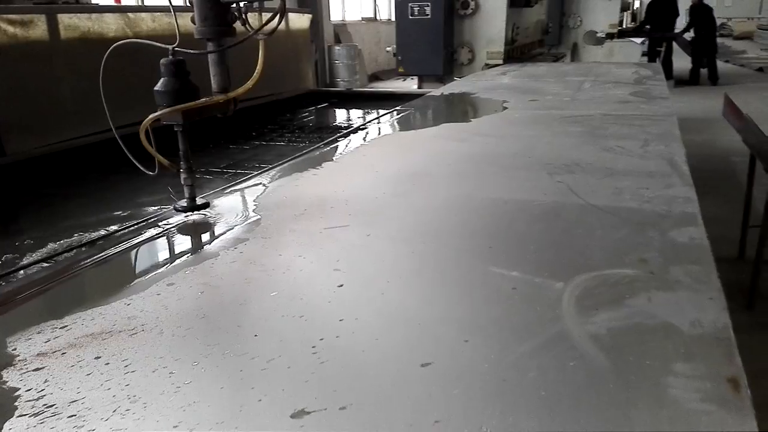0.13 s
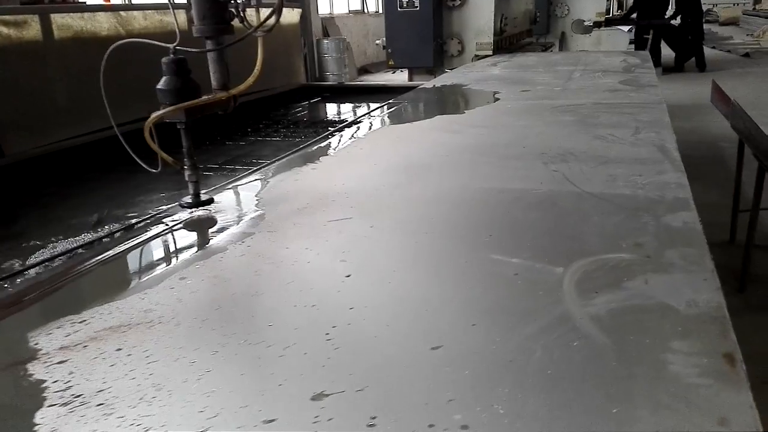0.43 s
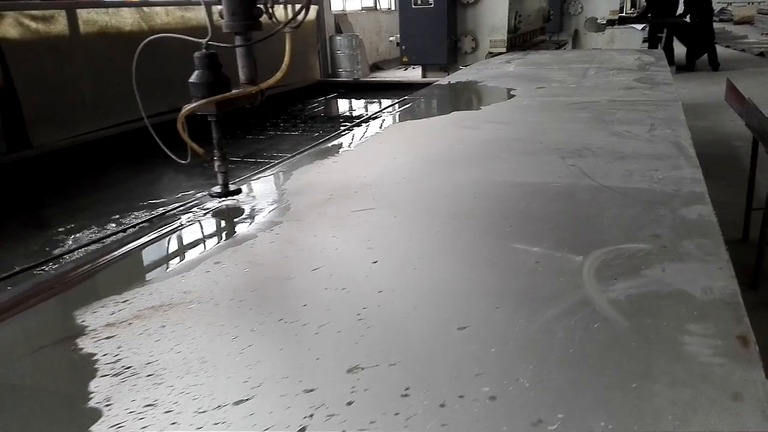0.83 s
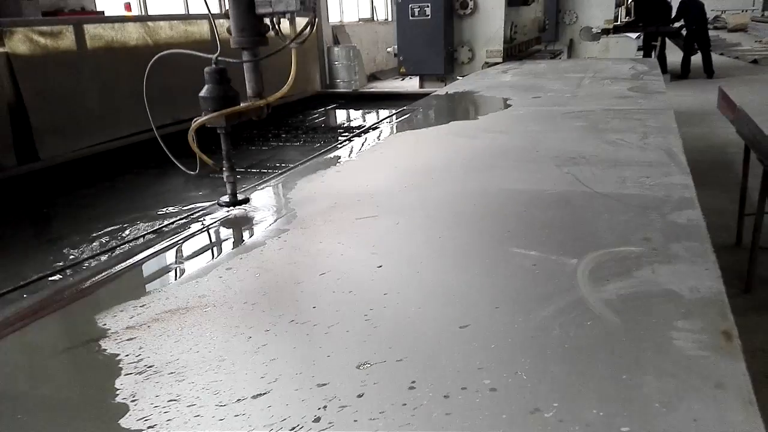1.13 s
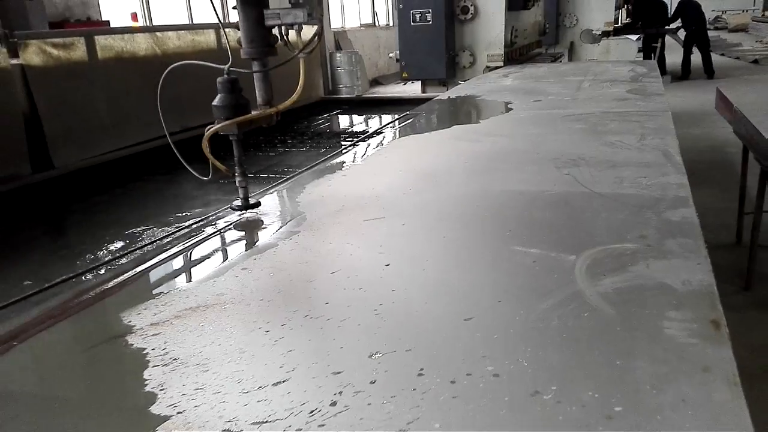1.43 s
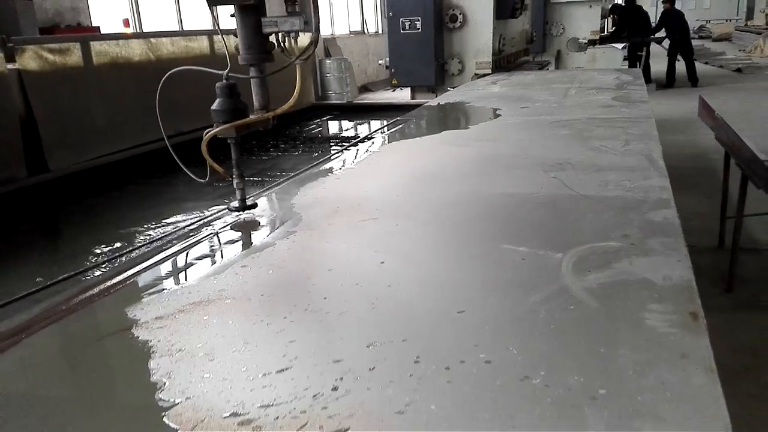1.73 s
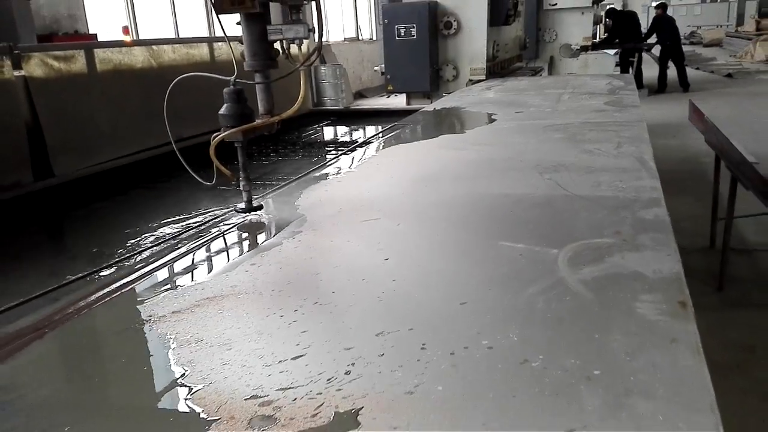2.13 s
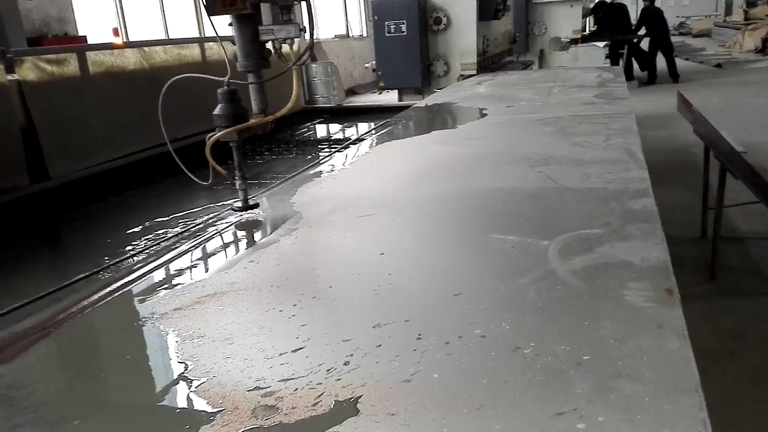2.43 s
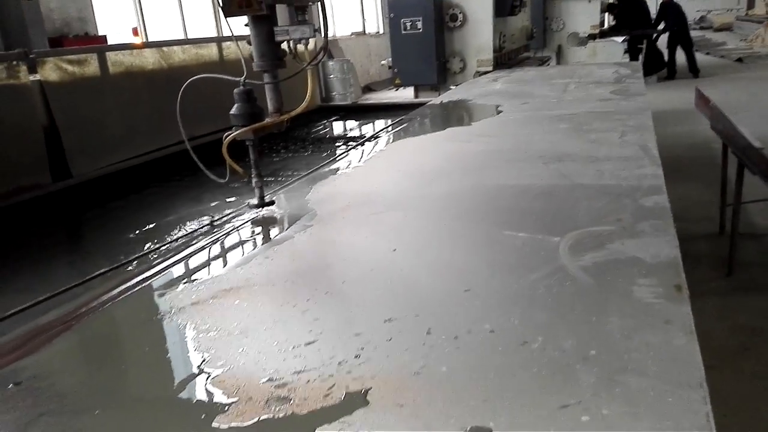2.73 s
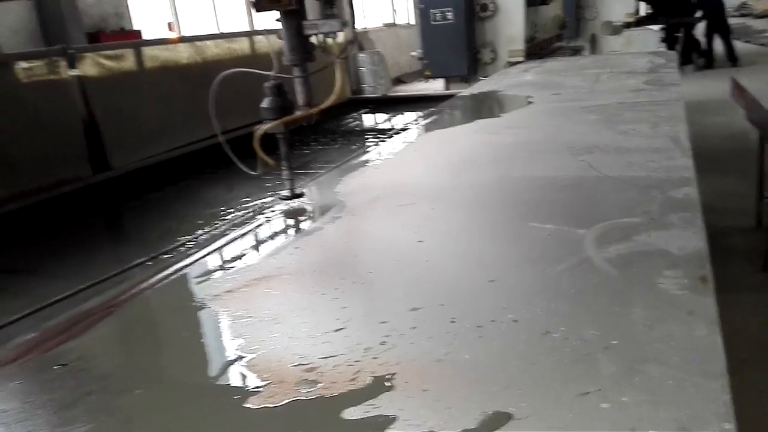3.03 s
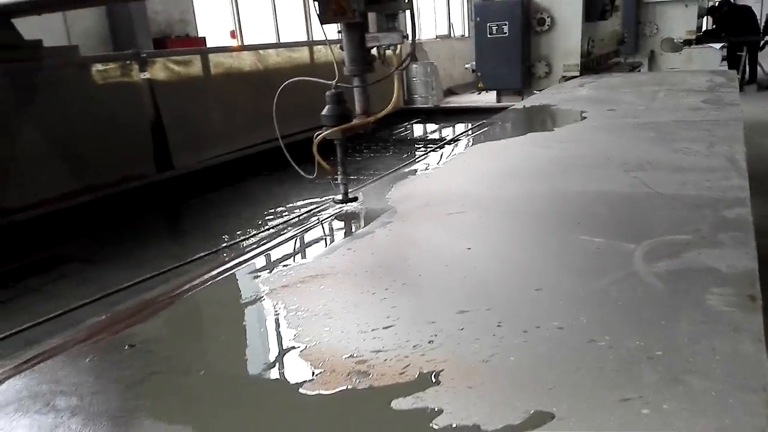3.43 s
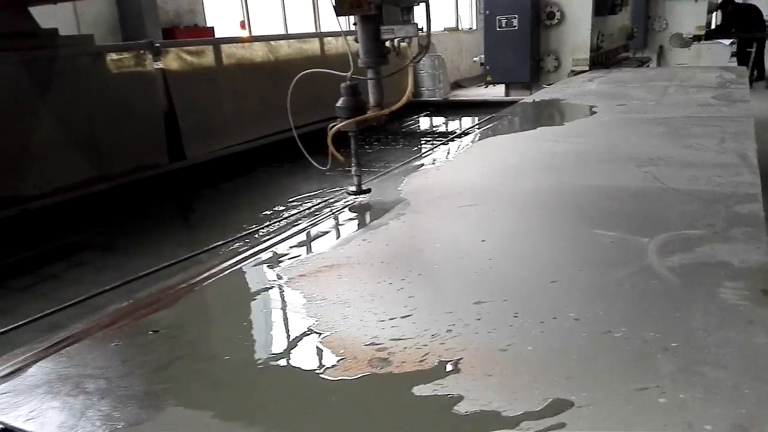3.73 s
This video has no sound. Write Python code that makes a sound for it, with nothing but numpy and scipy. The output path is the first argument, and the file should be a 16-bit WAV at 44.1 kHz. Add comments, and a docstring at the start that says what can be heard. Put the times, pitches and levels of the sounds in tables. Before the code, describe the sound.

A high-pressure waterjet cutter hisses and roars continuously through a wet metal plate, very loud and close.

```python
"""Waterjet cutting a wet plate

A high-pressure waterjet cuts a wet metal plate in a workshop, close to a handheld stereo microphone.
Coloured noise makes the sputtering hiss, the fine spray, and the roar and churn in the tank below.
Noise in a moving narrow band makes the slot's hoarse whistle; fixed bands make the pump tones.
Two throatier surges break through the plate. The loud sound overloads the microphone."""
import sys
import numpy as np
from scipy import signal
from scipy.fft import rfft, irfft, next_fast_len
from scipy.io import wavfile
from scipy.ndimage import uniform_filter1d, map_coordinates

SR = 44100
rng = np.random.default_rng(int(sys.argv[2]) if len(sys.argv) > 2 else 0)


def inscribe(sig):
    """Save sig as 16-bit PCM at rate SR to the path in sys.argv[1].

    A 1-D sig is mono; a 2-D sig holds one channel per row.
    Samples are clipped to [-1, 1] before scaling.
    """
    pcm = np.round(np.clip(np.atleast_2d(sig).T, -1, 1) * 32767)
    wavfile.write(sys.argv[1], SR, pcm.astype(np.int16))


N = 171108  # length in samples

# Layer levels over time, before each layer's trim and wobble: start_s, level_db
# the jet striking the plate
JET_LEVEL = [(0, -13.5), (.09, -16.5), (.18, -15), (.3, -12), (.46, -17), (.53, -15), (.83, -13),
             (.97, -14), (1.12, -16.5), (1.19, -14), (1.3, -14), (1.42, -16.5), (1.54, -17), (1.64, -12),
             (1.68, -15.5), (1.74, -12.5), (1.81, -13.5), (1.95, -12.5), (2.01, -16.5), (2.08, -17.5),
             (2.11, -14), (2.16, -18.5), (2.21, -14.5), (2.27, -17.5), (2.32, -13), (2.39, -15),
             (2.43, -12.5), (2.58, -11.5), (2.61, -16.5), (2.65, -11.5), (2.7, -15.5), (2.8, -14),
             (2.9, -14), (2.97, -11), (3.45, -12), (3.59, -15.5), (3.68, -12.5), (3.87, -13)]
# fine spray
SPRAY_LEVEL = [(0, -22), (.06, -23.5), (.14, -22), (.35, -21.5), (.42, -24.5), (.76, -20.5), (.96, -21),
               (1.06, -19), (1.11, -22.5), (1.31, -20.5), (1.49, -24), (1.76, -19.5), (1.92, -20.5),
               (2.06, -23.5), (2.32, -22.5), (2.52, -15.5), (2.61, -23), (2.79, -18), (2.9, -23.5),
               (2.99, -20.5), (3.08, -20.5), (3.15, -17), (3.24, -21.5), (3.45, -18), (3.6, -20.5),
               (3.88, -20)]
# the jet roaring through the plate into the tank
ROAR_LEVEL = [(0, -22), (.2, -24), (.33, -21.5), (.43, -20.5), (.8, -21), (1.3, -20.5), (1.47, -16),
              (1.8, -18.5), (2.25, -19), (2.68, -19), (2.76, -18), (2.8, -22.5), (3.1, -21), (3.27, -23.5),
              (3.43, -17.5), (3.52, -22.5), (3.65, -21), (3.72, -16.5), (3.88, -17)]
# water churning in the tank
CHURN_LEVEL = [(0.0, -33), (0.1, -20.5), (0.22, -27.0), (0.28, -21.5), (0.36, -27), (0.49, -24),
               (1.34, -28.5), (1.43, -19), (1.9, -24.5), (1.99, -18), (2.4, -27.5), (2.43, -45), (2.5, -25),
               (2.86, -25.5), (2.91, -16.5), (2.98, -37), (3.09, -24), (3.18, -40), (3.26, -22),
               (3.58, -32), (3.76, -14), (3.87, -18.5)]
# hoarse whistle of the slot (wobble only, no trim)
WHISTLE_LEVEL = [(0, -31), (.5, -18), (1.4, -27), (1.5, -26), (1.74, -21.5), (1.8, -7), (1.86, -23),
                 (2.06, -21), (2.1, -7), (2.16, -28), (2.57, -20), (2.63, -8.5), (2.76, -9.5), (2.81, -22),
                 (2.87, -11), (2.94, -26), (3.02, -18), (3.55, -29), (3.8, -13)]
JET_TRIM_DB, SPRAY_TRIM_DB, ROAR_TRIM_DB, CHURN_TRIM_DB = 6, 3.5, 3.5, 0.5
SHOP_LEVEL_DB = -28.5

# Spectral colour of each layer, only the shape counts: freq_hz, relative_db
# hiss at the cut
JET_COLOUR = [(500, -31.5), (1200, -14.5), (2000, -4.5), (2700, -1), (3350, -2), (3900, 0.5), (4500, 2),
              (4900, 1.3), (5300, -0.5), (5700, -4), (6800, -8), (9000, -21), (14000, -45)]
# fizz of the mist
SPRAY_COLOUR = [(2500, -37), (5500, -4), (7200, 0.5), (8500, 0.5), (10500, -2.5), (13300, -7),
                (14200, -11.5)]
# roar in the tank
ROAR_COLOUR = [(200, -14), (450, -6), (650, -4), (850, -0.5), (1100, -1), (1450, -1.5), (1800, -5),
               (2700, -6.5), (5000, -40)]
# churning water
CHURN_COLOUR = [(20, -30), (95, -15), (138, -4), (230, -2), (310, 0.5), (420, 1.5), (560, -3.5), (800, -5),
                (1300, -10), (3000, -42)]
# low rumble of the hall
SHOP_COLOUR = [(12, 13.5), (33, 3.5), (46, 3.5), (57, -3), (80, 6), (120, -7), (250, -13), (800, -30)]
# throaty rush of a breakthrough
SURGE_COLOUR = [(90, -21), (130, -5), (220, -12), (380, -5.5), (700, -3.5), (1000, -1.5), (1350, 2),
                (1750, -0.5), (2400, -4), (3200, -8.5), (5000, -35)]

# pump and motor tones: pitch_hz, level_db, width_hz (each side of the pitch, where it is 6 dB down)
PUMP_TONES = [(170.8, -36, 7.4), (304, -36, 9.5), (1032, -34.5, 8)]
# likeness of the noise at the two microphone ports: freq_hz, correlation (-1 to 1)
PORT_LIKENESS = [(50, 1), (220, 0.92), (370, .75), (580, -0.35), (820, 0.21), (1200, 0.57), (1600, 0.027),
                 (2100, -0.087), (2800, -0.13), (3400, 0.32), (3900, -0.38), (4500, -0.23), (5200, -0.01),
                 (13000, -0.058)]
# each port has its own resonance: freq_hz, left_minus_right_db
PORT_BALANCE = [(200, -1), (1400, -0.5), (2100, -1.5), (2700, -4.5), (3350, -3), (4000, -6), (4500, -2.5),
                (4800, 4.5), (5100, 3), (5500, 2), (6600, 0.5), (8000, 1.5), (13000, 1.5)]
# centre of the whistle, which dips as the slot opens and then recovers: start_s, pitch_hz
WHISTLE_PITCH = [(0, 2900), (1.3, 2800), (1.8, 2980), (2.1, 2950), (2.6, 2880), (2.78, 2780), (2.87, 2560),
                 (3.03, 2800), (3.8, 2850)]
# surges as the jet breaks through the plate: start_s, end_s, level_db (before the sag)
SURGES = [(0.457, 1.148, -11.5), (3.672, 3.95, -9.5)]

WHISTLE_WANDER_HZ, WHISTLE_WIDTH_HZ, WHISTLE_LEFT_DB = 54.8, 176, -14.5
SURGE_ATTACK_S, SURGE_RELEASE_S, SURGE_SAG_DB_PER_S = 0.022, 0.065, 4
SPUTTER_DB, LUMP_DB = 0.7, 1.4
RIPPLE_DB = 2.5  # fine peaks and dips from the hall's reflections, shifting as the microphone moves
OVERLOAD, KNEE = 1, 4.7  # level at which the microphone flattens, hardness of the bend
LOW_CUT_HZ, TOP_HZ = 100, 14100


def amp(db):
    """Decibels to gain."""
    return 10 ** (np.asarray(db) / 20)


def unit(x):
    """Scale to rms 1."""
    return x / np.sqrt(np.mean(x ** 2) + 1e-20)


def along(points, hz):
    """Read (freq_hz, value) points on a log frequency axis."""
    f, v = np.transpose(points)
    return np.interp(np.log(hz + 1), np.log(f + 1), v)


def curve(rows):
    """Read (start_s, value) points at every sample, in straight lines."""
    return np.interp(np.arange(N) / SR, *np.transpose(rows))


def wobble(knots_per_s):
    """A smooth random curve through normally distributed knots."""
    knots = rng.standard_normal(2048)
    return map_coordinates(knots, [np.arange(N) * knots_per_s / SR], mode="wrap")


def filtered(x, response):
    """Shape the spectrum of x by a gain that depends on frequency."""
    m = next_fast_len(N + SR // 4)
    hz = np.fft.rfftfreq(m, 1 / SR)
    return irfft(rfft(x, m) * response(hz), m)[..., :N]


def patchy(x, depth_db, size, order):
    """Give x patches of random gain, order = (bins, frames) wide, in windows of size samples."""
    overlap = size * 3 // 4
    z = signal.stft(x, nperseg=size, noverlap=overlap)[2]
    field = uniform_filter1d(rng.standard_normal(z.shape), order[0], axis=1)
    field = uniform_filter1d(field, order[1], axis=2)
    z = z * amp(depth_db * unit(field))
    return signal.istft(z, nperseg=size, noverlap=overlap)[1][:, :N]


def rush(colour, patchy_db):
    """Turbulent noise at the two ports, coloured, with short-lived patches of emphasis."""
    pair = patchy(rng.standard_normal((2, N)), patchy_db, size=1024, order=(5, 12))
    pair = patchy(pair, RIPPLE_DB, size=4096, order=(3, 6))

    def mid_side_response(hz):
        # the split between mid and side sets how alike the ports are
        angle = np.arccos(np.clip(along(PORT_LIKENESS, hz), -1, 1)) / 2
        return amp(along(colour, hz)) * [np.cos(angle), np.sin(angle)]

    def port_response(hz):
        return amp(np.outer([0.5, -0.5], along(PORT_BALANCE, hz)))

    mid, side = filtered(pair, mid_side_response)
    left_right = np.array([mid + side, mid - side])
    return unit(filtered(left_right, port_response))


def narrow(hz, width_hz):
    """Noise ringing in one narrow resonance, which may move."""
    # slow noise on two carriers a quarter turn apart
    a, b = filtered(rng.standard_normal((2, N)), lambda f: 1 / (1 + (f / width_hz) ** 2))
    phase = 2 * np.pi * np.cumsum(hz * np.ones(N)) / SR
    return unit(a * np.cos(phase) + b * np.sin(phase))


def jet():
    """The hiss at the cut sputters quickly as the jet bites: noise under a fast level wobble."""
    level_db = curve(JET_LEVEL) + JET_TRIM_DB + SPUTTER_DB * wobble(32.08)
    return amp(level_db) * rush(JET_COLOUR, patchy_db=1.95)


def spray():
    """Fine mist fizzes above the hiss: treble noise flickering in broad patches."""
    mist = rush(SPRAY_COLOUR, patchy_db=3)
    mist = patchy(mist, 1.0, size=512, order=(30, 12))
    return amp(curve(SPRAY_LEVEL) + SPRAY_TRIM_DB) * unit(mist)


def whistle():
    """The slot resonates hoarsely at an unsteady pitch, mostly toward the right."""
    pitch_hz = curve(WHISTLE_PITCH) + WHISTLE_WANDER_HZ * wobble(30)
    level_db = curve(WHISTLE_LEVEL) + 2.2 * wobble(24.14)
    tone = amp(level_db) * narrow(pitch_hz, WHISTLE_WIDTH_HZ)
    return tone * amp([[WHISTLE_LEFT_DB], [0]])


def tank():
    """The spent jet roars in the tank and churns the water in lumps: two noises, each wobbling."""
    roar_db = curve(ROAR_LEVEL) + ROAR_TRIM_DB + 0.65 * wobble(22)
    roar = amp(roar_db) * rush(ROAR_COLOUR, patchy_db=1.4)
    churn_db = curve(CHURN_LEVEL) + CHURN_TRIM_DB + LUMP_DB * wobble(22.04)
    churn = amp(churn_db) * rush(CHURN_COLOUR, patchy_db=0.0)
    return roar + churn


def workshop():
    """Pump and motor tones, as narrow bands of noise, over the low rumble of the hall."""
    tones = sum(amp(level_db) * narrow(hz, width_hz) for hz, level_db, width_hz in PUMP_TONES)
    rumble = amp(SHOP_LEVEL_DB) * rush(SHOP_COLOUR, patchy_db=2.5)
    return tones + rumble


def surges():
    """Each breakthrough opens abruptly into a throatier rush, sags and closes."""
    t = np.arange(N) / SR
    gain = np.zeros(N)
    for start, end, level_db in SURGES:
        attack = np.clip((t - start) / SURGE_ATTACK_S, 0, 1)
        release = np.exp(-np.maximum(t - end, 0) / SURGE_RELEASE_S)
        sagging_db = level_db - SURGE_SAG_DB_PER_S * (t - start)
        gain += attack * release * amp(sagging_db)
    return gain * rush(SURGE_COLOUR, patchy_db=1.0)


def scene():
    """Sum the continuous layers and the surges in stereo."""
    return jet() + spray() + whistle() + tank() + workshop() + surges()


def record(dry):
    """The overloaded microphone flattens the peaks; the recorder thins the bass and has a band limit."""
    flattened = dry / (1 + np.abs(dry / OVERLOAD) ** KNEE) ** (1 / KNEE)
    return filtered(flattened, lambda hz: (hz < TOP_HZ) * hz / np.hypot(hz, LOW_CUT_HZ))


dry = scene()
out = record(dry)
inscribe(out)
```